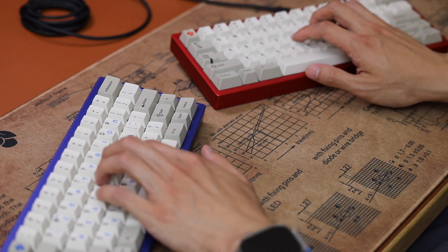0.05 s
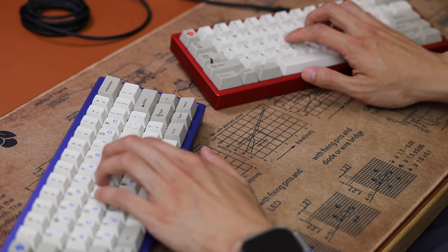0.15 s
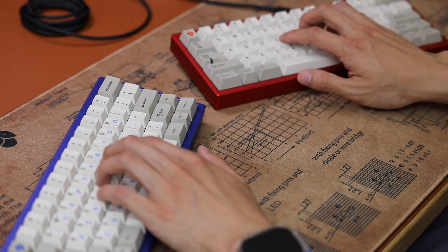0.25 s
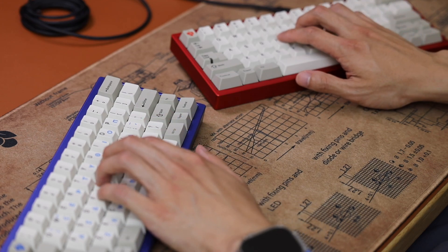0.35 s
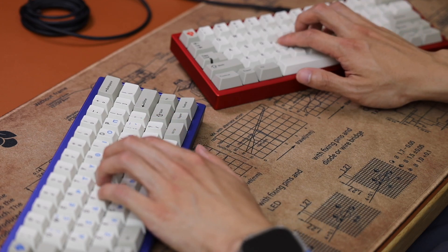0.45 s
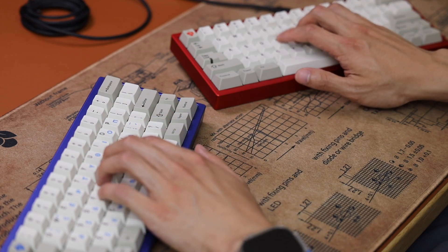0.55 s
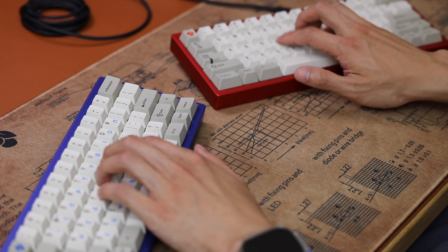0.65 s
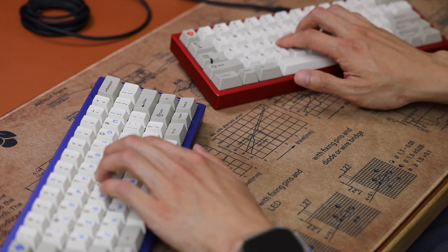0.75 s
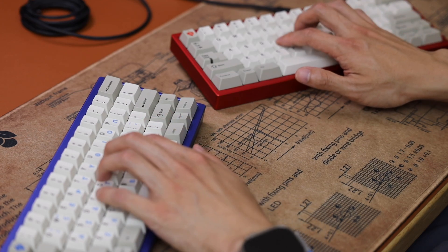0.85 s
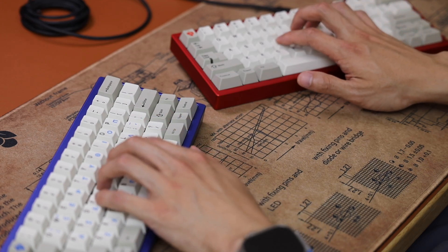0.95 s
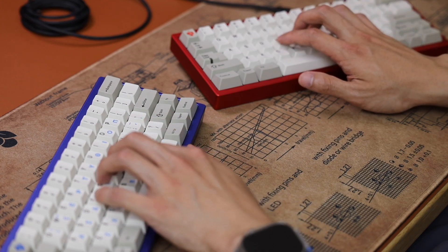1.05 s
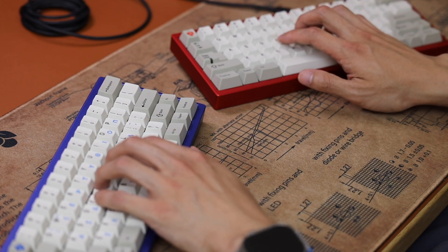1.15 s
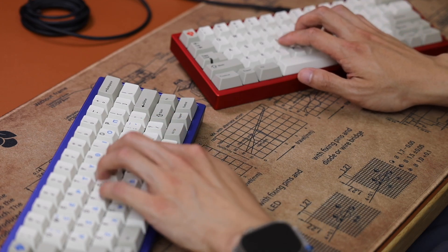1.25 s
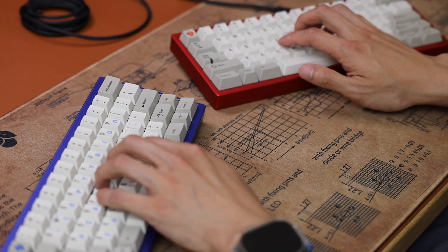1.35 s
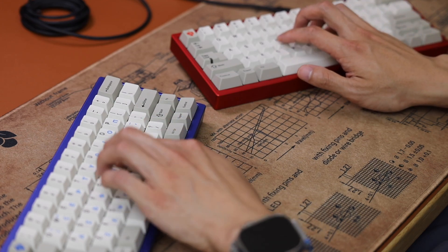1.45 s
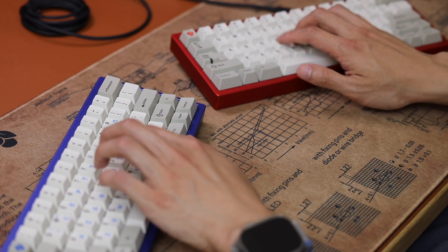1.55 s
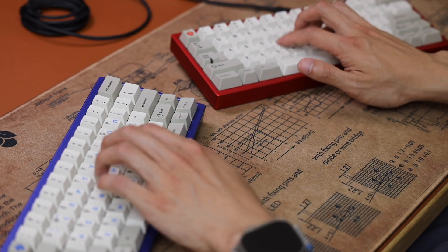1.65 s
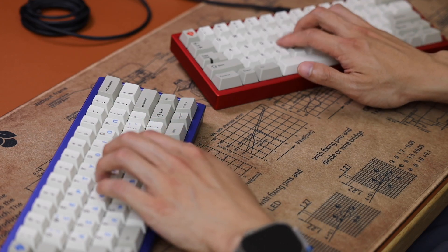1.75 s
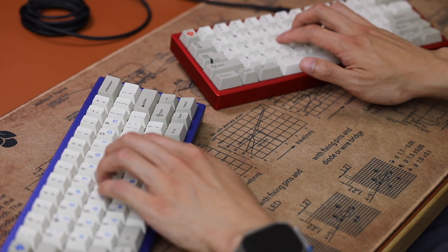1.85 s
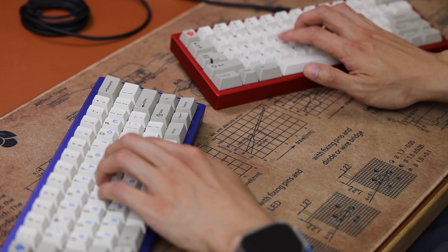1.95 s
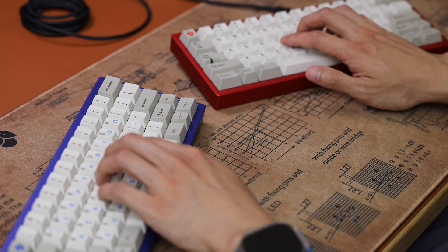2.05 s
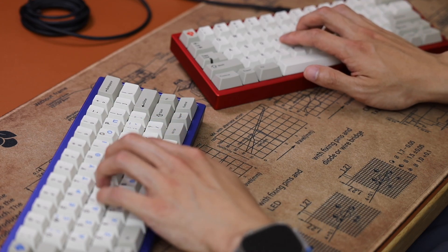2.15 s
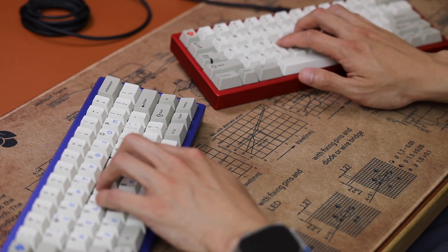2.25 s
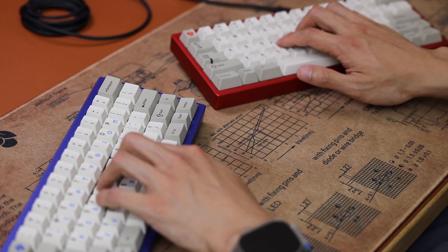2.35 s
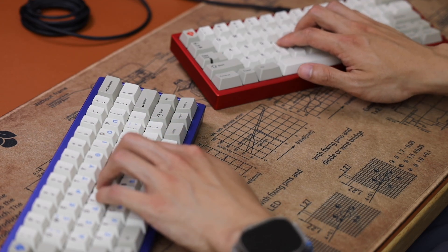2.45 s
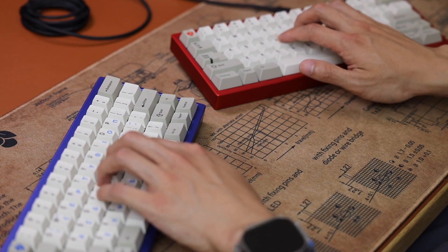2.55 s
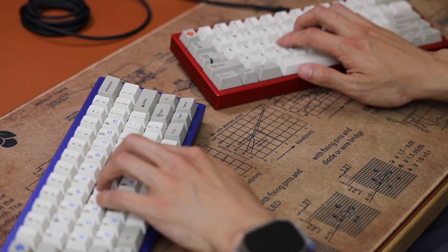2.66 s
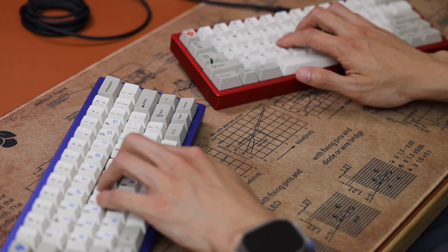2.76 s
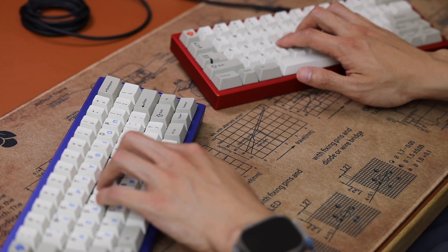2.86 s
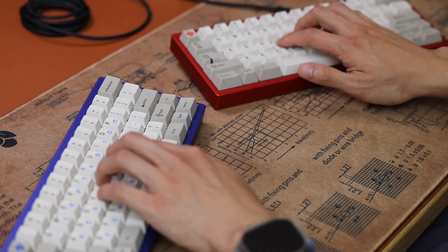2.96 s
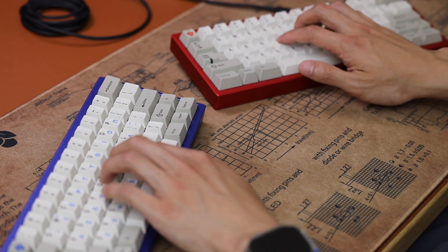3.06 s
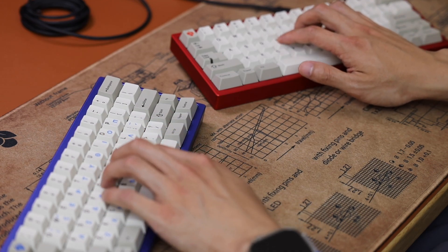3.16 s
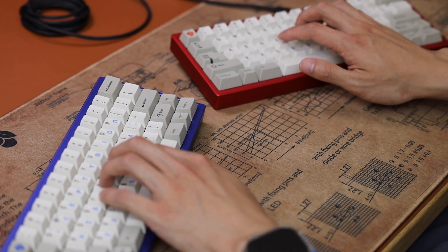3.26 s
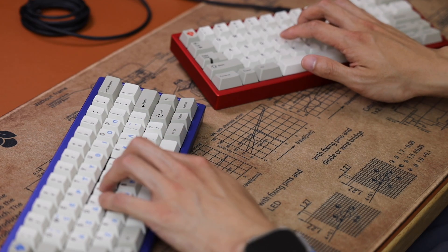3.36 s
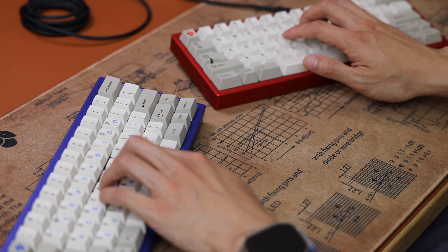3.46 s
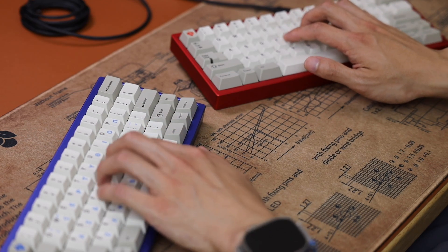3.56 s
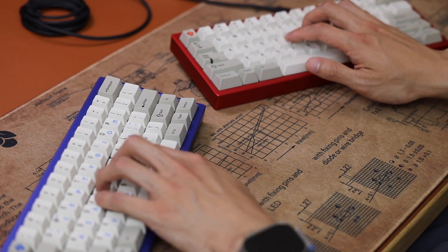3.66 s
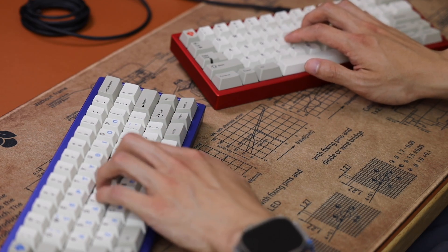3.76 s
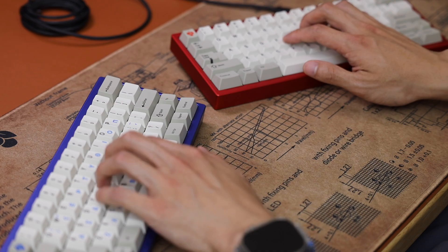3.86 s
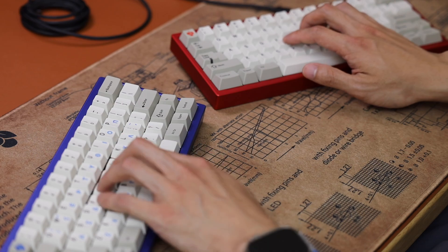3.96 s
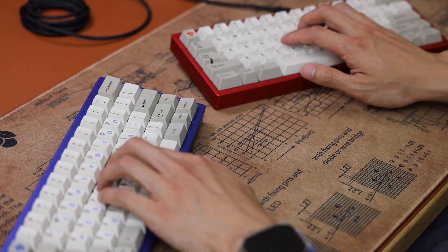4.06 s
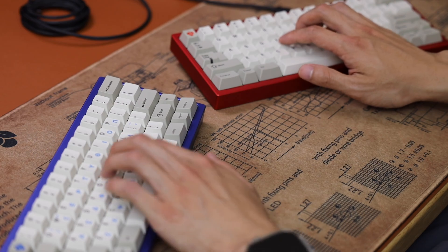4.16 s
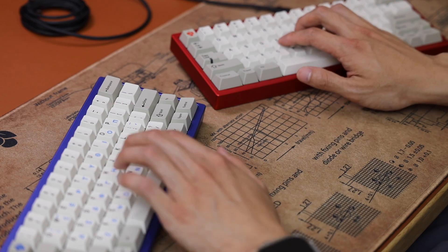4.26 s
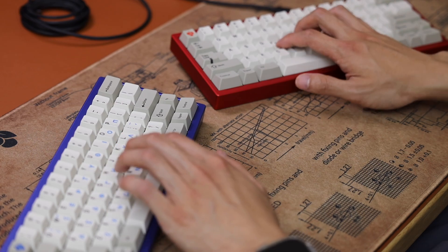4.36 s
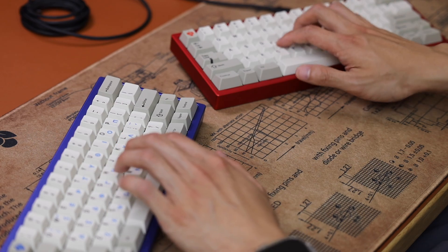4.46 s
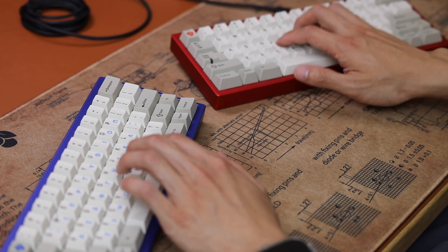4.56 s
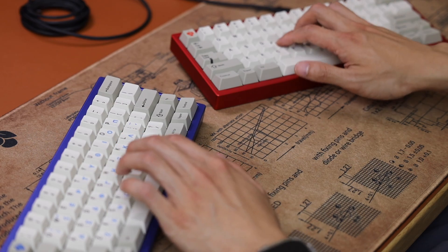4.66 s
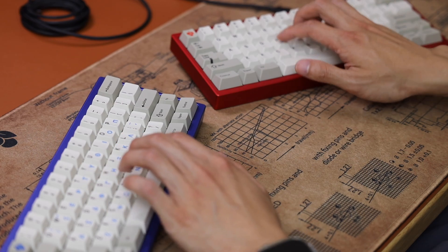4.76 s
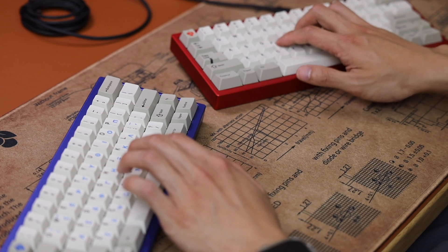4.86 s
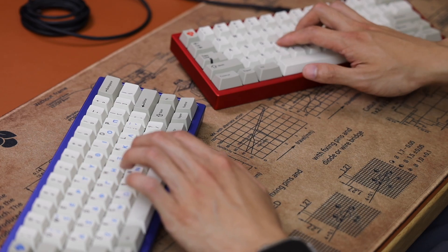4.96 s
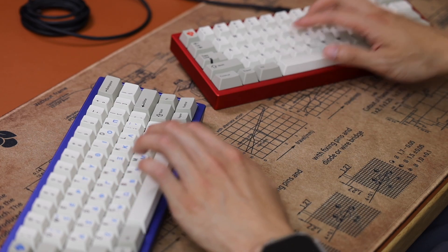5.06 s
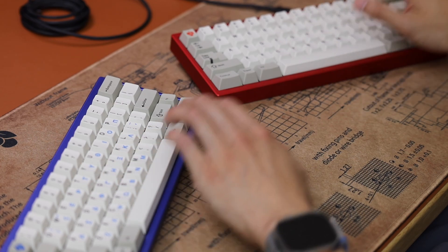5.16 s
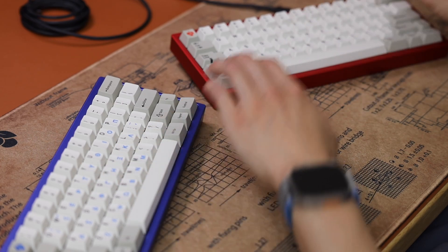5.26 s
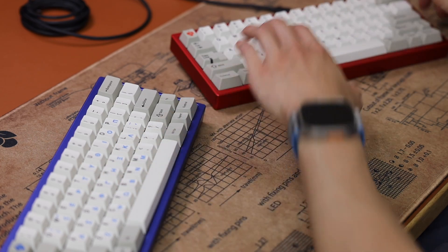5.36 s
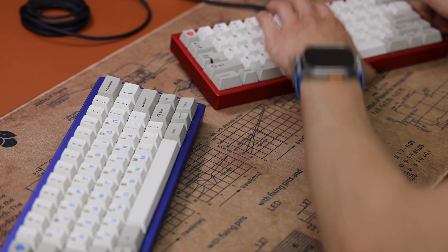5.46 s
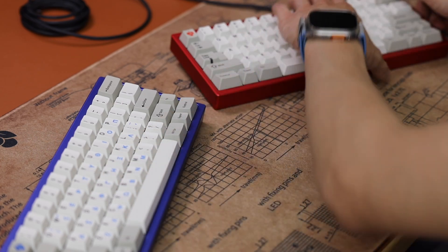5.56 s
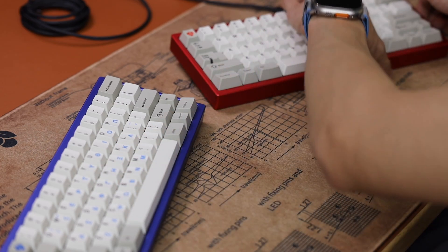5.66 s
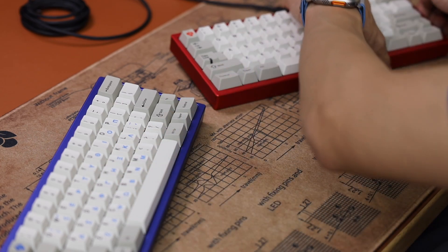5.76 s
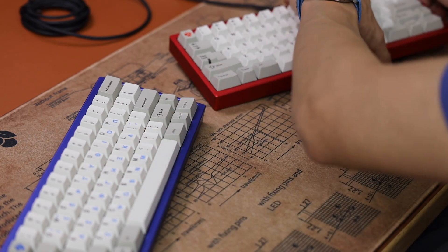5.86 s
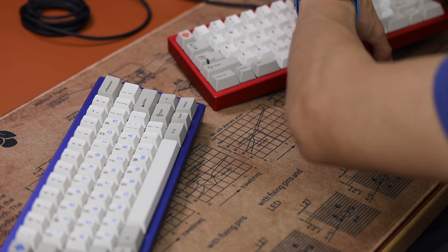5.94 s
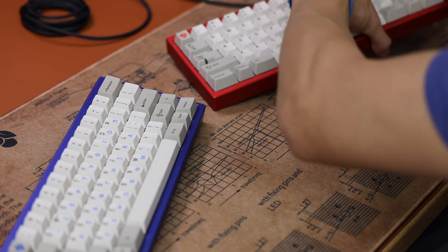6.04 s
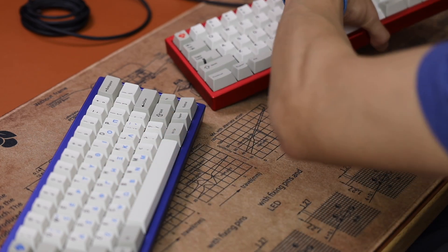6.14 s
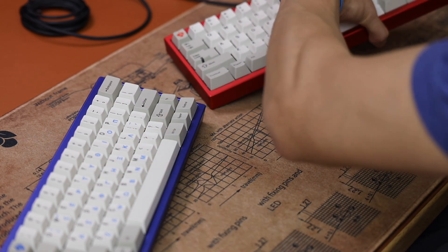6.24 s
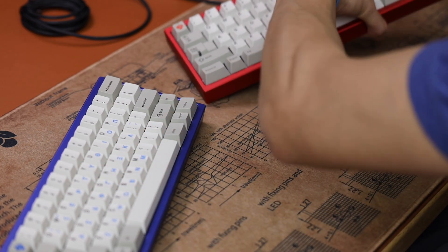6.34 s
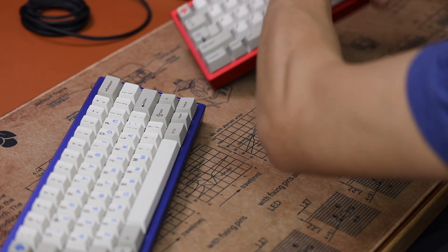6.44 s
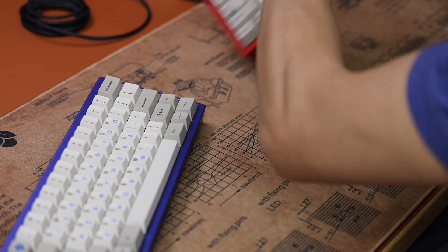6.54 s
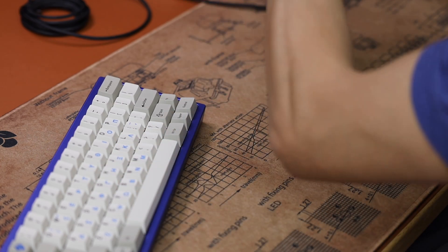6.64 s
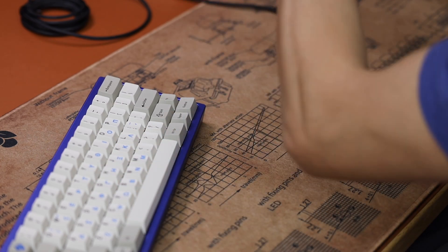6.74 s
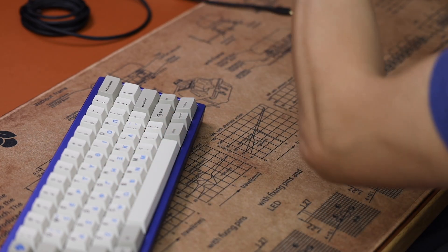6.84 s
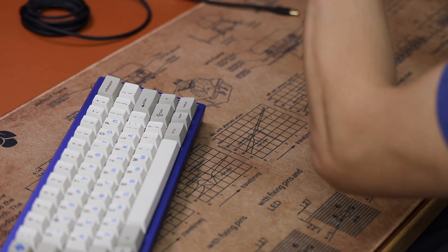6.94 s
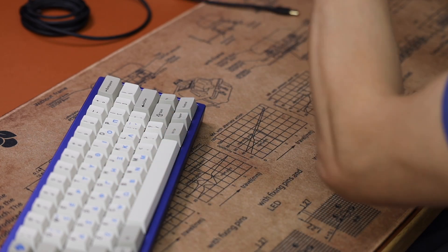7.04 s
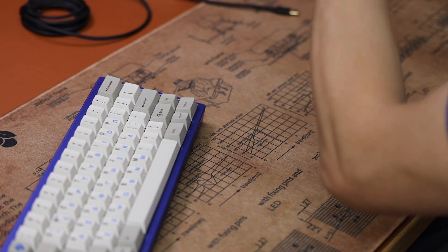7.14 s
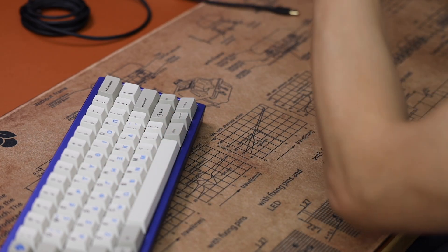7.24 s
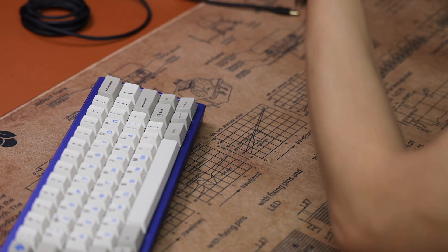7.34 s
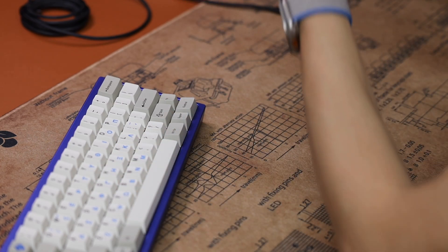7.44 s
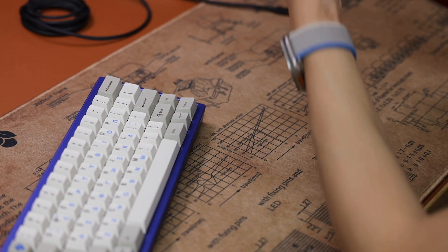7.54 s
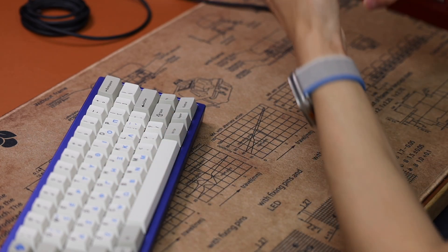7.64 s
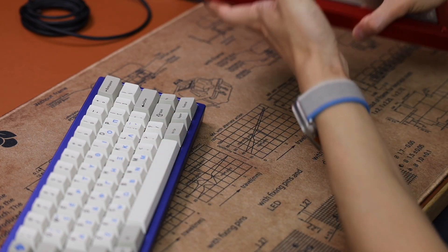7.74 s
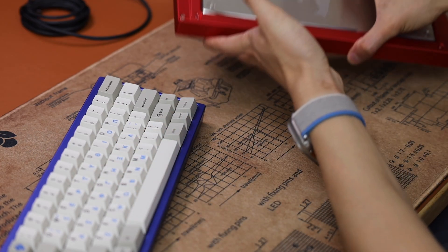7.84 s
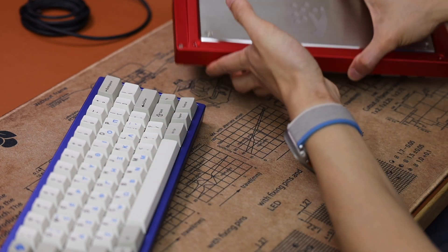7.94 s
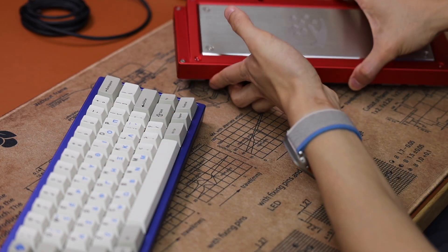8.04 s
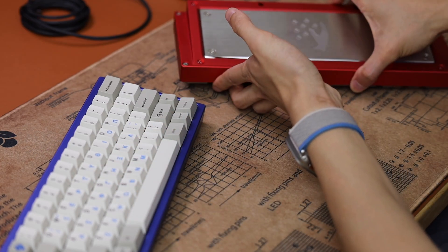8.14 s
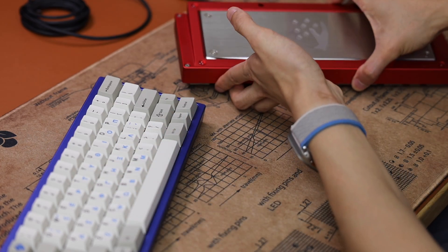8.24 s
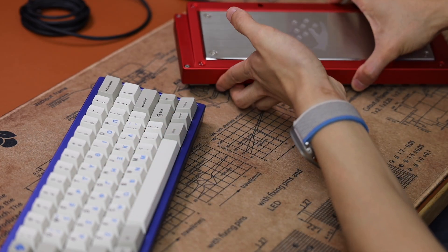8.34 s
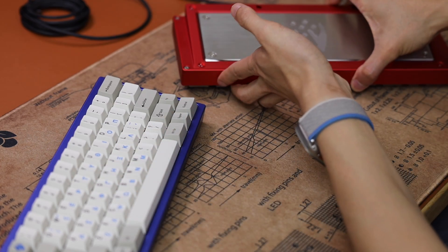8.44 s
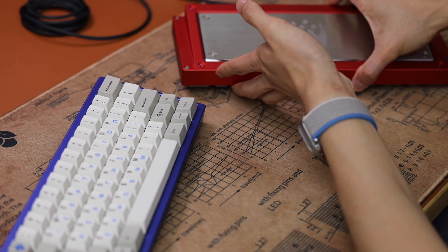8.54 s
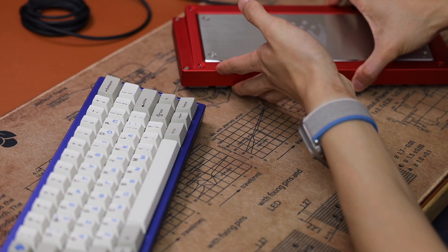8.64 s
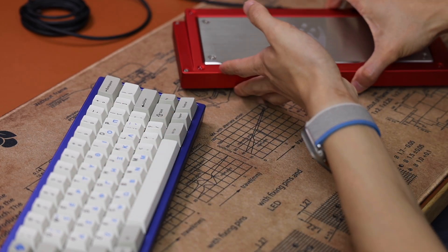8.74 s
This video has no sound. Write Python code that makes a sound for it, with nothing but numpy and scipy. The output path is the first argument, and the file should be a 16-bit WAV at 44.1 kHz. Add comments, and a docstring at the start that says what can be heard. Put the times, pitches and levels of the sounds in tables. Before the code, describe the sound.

Fingers drum crisp mechanical keys in a small hard room, then stop; quiet case knocks and a brief hiss of skin follow over faint fan hum.

```python
"""Desk in a small hard room: fingers drum on two mechanical keyboards, fast single keys, then handfuls.
One keyboard is then lifted and turned over with a few knocks and a rub. Keys, knocks and desk booms are
sums of dying sines; the rub is shaped noise. Echoes and a sparse noise tail answer keys and knocks.
A faint fan (narrow noise bands) and microphone hiss (broad noise) lie underneath."""
import sys
import numpy as np
from scipy import signal
from scipy.fft import rfft, irfft
from scipy.io import wavfile
from scipy.ndimage import uniform_filter1d

SR = 44100
rng = np.random.default_rng(int(sys.argv[2]) if len(sys.argv) > 2 else 0)


def voltage_ratio(decibels):
    """Convert decibels (scalar or array-like) to amplitude ratios, 20 dB per decade."""
    exponent = np.asarray(decibels, float) / 20
    return 10 ** exponent


def generate_wav(signal):
    """Clip the signal to [-1, 1] and save it as 16-bit WAV at the path in sys.argv[1]."""
    frames = np.transpose(np.atleast_2d(signal))
    scaled = np.clip(frames, -1, 1) * 32767
    pcm = np.round(scaled).astype(np.int16)
    wavfile.write(sys.argv[1], SR, pcm)


N = 388064  # samples

# keys landing or springing back: [t/s, level/dB, cap f/Hz, stem tick re cap/dB]
KEY_HITS = [(-0.038, -17.5, 3100, -6.5), (0.0633, -35, 2690, -6), (0.1311, -46, 3300, -17),
            (0.2835, -37.5, 1780, -13), (0.3707, -27, 3100, -16), (0.432, -17, 3090, -5),
            (0.5092, -16.5, 3080, -9), (0.5686, -15.5, 2850, -7.5), (0.6317, -16, 3060, -7),
            (0.6918, -19.5, 3130, -9.5), (0.7435, -22, 3000, -12), (0.7637, -16, 3020, -5.5),
            (0.7993, -15.5, 3200, -8.5), (0.9288, -17.5, 3300, -9.5), (0.9947, -23.5, 3450, -7),
            (0.9971, -20, 3200, -7.5), (1.0511, -20, 3330, -9.5), (1.1291, -18, 3310, -13),
            (1.2111, -16.5, 3530, -7), (1.261, -20, 3340, -3.5), (1.2846, -20, 3040, -13),
            (1.3523, -12.5, 3280, -7.5), (1.3804, -21, 3300, -15), (1.4413, -18.5, 3330, -11),
            (1.4699, -21, 3360, -10), (1.5146, -17.5, 3280, -12), (1.5473, -17, 3400, -12),
            (1.5712, -17.5, 2600, -1), (1.6372, -18.5, 3370, -9), (1.6965, -30, 1740, -4),
            (1.7226, -21.5, 3230, -18), (1.7412, -16, 3030, -12), (1.7659, -23, 2870, -8),
            (1.8054, -16.5, 3200, -7), (2.2202, -14, 3150, -9.5), (2.2491, -20.5, 3400, 1.5),
            (2.255, -31, 3160, -1), (2.2614, -13, 2880, -10), (2.2633, -13.5, 3100, -6),
            (2.272, -29.5, 3200, -15), (2.307, -34, 2780, -2), (2.5431, -33, 3200, -8),
            (2.5483, -35, 1757, -12), (2.6767, -20, 3360, -8), (2.688, -20.5, 3400, -7),
            (2.6952, -15.5, 3060, -1), (2.7079, -8, 3440, -14), (2.7184, -15, 2700, -4.5),
            (2.9308, -42.5, 2900, 2), (3.0064, -32, 3180, -14), (3.3257, -12.5, 3360, -6.5),
            (3.3374, -16, 3200, -4), (3.3459, -16, 3050, -13), (3.355, -21, 3280, -9),
            (3.361, -41, 2880, -18), (3.5678, -27.5, 3030, -9), (3.6375, -6.5, 3340, -9.5),
            (3.8663, -26.5, 3150, -3), (3.9287, -12, 3320, -8.5), (3.931, -11, 2940, -1),
            (3.943, -20, 2940, -15), (3.9518, -23, 3250, -15), (4.1632, -26.5, 3390, -14),
            (4.1666, -21, 3030, -5.5), (4.3182, -17.5, 2920, -4.5), (4.3273, -13, 3500, -16),
            (4.3367, -8.5, 2940, -2.5), (4.5126, -28.5, 3200, -16), (4.5165, -27.5, 3320, -9),
            (4.53, -32, 2900, -12), (4.6022, -14, 3040, -5), (4.609, -10.5, 2960, -3.5),
            (4.615, -14.5, 2950, -29), (4.7363, -22.5, 2730, -8), (4.8283, -14.5, 2950, 0),
            (4.8305, -16, 2780, -1), (4.8323, -7.5, 2870, -8.5), (4.8487, -21, 2880, -13),
            (5.0503, -24.5, 3120, -0.5), (5.054, -22.5, 1680, -20), (5.064, -22.5, 3010, -16)]
# low clack of the housing: [f/Hz, relative level/dB, t60/s]
HOUSING_MODES = [(1213, -11.5, 0.014), (1405, 4.5, 0.0047), (1764, 6, 0.0037), (2240, -9, 0.011)]
# bright tick of the stem: [f/Hz, relative level/dB, t60/s]
STEM_MODES = [(4690, 7.5, 0.0061), (6000, 11.5, 0.0025), (7090, 20.5, 0.0012), (10240, 11, 0.0051),
              (12800, -0.5, 0.0043)]
# plate under the keys: [f/Hz, relative level/dB, t60/s]
PLATE_MODES = [(1380, -6, 0.24), (1705, -3, 0.1), (2480, 30, 0.0087), (2940, 19, 0.023), (3030, -7, 0.028),
               (3360, -37.5, 0.077), (3860, -1.5, 0.02)]
# hands and cable on the lifted case: [t/s, level/dB, f/Hz, crack re body/dB]
CASE_KNOCKS = [(5.602, -28.5, 2800, -15), (5.638, -30.5, 1730, -15), (5.965, -32.5, 320, -17),
               (5.967, -31.5, 740, -14), (5.967, -35, 2980, -9), (6.28, -38.5, 1320, -20),
               (7.543, -32, 2520, -14), (7.574, -41.5, 1510, -18), (7.643, -24.5, 1580, -13),
               (7.678, -34, 1500, -24), (7.718, -24.5, 4860, -28), (7.753, -33, 2000, -28),
               (8.749, -36, 1120, -9)]
# partials of a knock: [multiple of its f, relative level/dB]
CASE_PARTIALS = [(.47, -28), (0.699, 4), (1, 6.5), (1.22, 3), (1.45, -0.5), (1.95, -5)]
# firm blows shaking the desk top: [t/s, level/dB, mode tilt/(dB/octave)]
DESK_THUMPS = [(0.433, -48, 10), (0.51, -47, 4), (0.57, -38, 11.5), (0.687, -42, 11), (0.744, -40.5, -4),
               (0.764, -38.5, 6.5), (1.547, -45, 8), (1.574, -38, 3), (1.643, -44, 2), (1.739, -42, 10.5),
               (1.802, -42.5, 6), (2.264, -38, 2), (2.71, -38, 7), (4.325, -37, 5), (4.341, -31, 4),
               (4.61, -32, -4), (4.824, -37, 12.5), (5.639, -55, 0.1), (5.965, -36, -10), (8.749, -45, 22)]
# desk top, before tilt: [f/Hz, relative level/dB, t60/s]
DESK_MODES = [(75.2, -4.5, 0.33), (106, -16, .15), (138.5, 8.5, 0.27), (169.7, -2.5, 0.57),
              (206.3, 3, 0.19), (256, -12.5, 0.83), (374, -11.5, 0.11)]
# rub spectrum: [f/Hz, relative level/dB]
RUB_SPECTRUM = [(500, -7), (1500, 7.5), (4000, 8), (8000, -0.5), (14000, -4), (16500, -14.5)]
# single early echoes: [delay t/s, left level/dB, right level/dB]
EARLY_ECHOES = [(.0019, -11, -16), (.0066, -10, -14), (.0082, -13, -13), (.0098, -17, -12),
                (.0128, -13, -14)]
# overhead echo and side of each board, rows far, near: [delay t/s, level/dB, left-right/dB]
BOARD_ECHOES = [(.0054, -12, -1.5), (.0047, 1, -3)]
# room tail: [f/Hz, t60/s]
TAIL_T60 = [(200, 0.39), (700, 0.59), (1800, 0.46), (4800, 0.43), (12000, 0.31)]
# fan tones: [f/Hz, rms level/dB, full width at half amplitude/Hz]
FAN_TONES = [(90.3, -69, 11), (326.3, -71.5, 9.9), (1213, -72.5, 12), (2300, -87, 2.7)]
# hiss spectrum: [f/Hz, relative level/dB]
AIR_SPECTRUM = [(18, -51), (30, -23), (86, -5), (125, -8.5), (171, -6), (261, -7), (323, -5.5), (625, -9.5),
                (1210, -12), (1420, -14.5), (14800, -28), (16500, -26)]
# left-right likeness of hiss and tail: [f/Hz, correlation]
LIKENESS = [(40, 0.77), (125, 0.67), (250, 0.62), (500, 0.6), (1000, 0.47), (2000, 0.08), (5000, -0.058),
            (14000, -0.26)]
# left-right balance of the noises: [f/Hz, left-right/dB]
BALANCE = [(60, -1.2), (380, -1.7), (2380, -2.5), (15000, 0.28)]

LEAD_SAMPLES = 4410  # room before time zero, for a key whose echo is still sounding
CONTACT_S = 0.0007  # first touch to blow
USUAL_CAP_HZ, CAP_T60_S, LONG_CAP_POWER = 3100, 0.0022, 2.7  # lower caps ring longer
PLATE_DB = -21.5
# housing share re cap at the usual level; dB lost per dB louder; ceiling before scatter
USUAL_DB, CLACK_DB, CLACK_SINK, CLACK_TOP_DB, CLACK_SCATTER_DB = -20, -13.5, 0.55, 1.5, 3
SOFT_DB, RATTLE_S = -27.5, 0.012  # softer keys spring back loosely
KEY_LOW_CUT_HZ = 754  # small caps radiate little below
DIP_HZ, DIP_Q = 11840, 26  # narrow dip in the treble of the keys, cut by a notch filter
PLACE, PLACE_SCATTER = 0.68, 0.12  # 0 far board, 1 near board
KNOCK_CYCLES = 11.3  # swings per t60
RUB_S, RUB_RISE_S, RUB_HOLD_S, RUB_FADE_S = 6.255, 0.042, 0.15, 0.13
RUB_DB, RUB_ENDS_DB, RUB_SWELL_DB = -50.5, -27, 0.5  # ends and swell re RUB_DB
SHADE_HZ, SHADE_DB = 8500, -8  # hands shade the treble of direct sound and early echoes
SCATTER_S, FRONT = 0.0019, 7.0  # overhead echo: decay constant; first arrival re scatter
TAIL_BUILD_S, TAIL_DB = 0.0035, 2  # the tail swells before it dies
AIR_DB = -54
BASS_CUT_HZ = 25


def keys():
    """Each key sums dying sines of cap, housing, stem and plate; soft ones rattle."""
    mix = np.zeros((4, N + LEAD_SAMPLES))
    draws = rng.standard_normal((len(KEY_HITS), 8))
    for (s, db, hz, tick_db), luck in zip(KEY_HITS, draws):
        clack_db = min(CLACK_DB - CLACK_SINK * (db - USUAL_DB), CLACK_TOP_DB)
        clack_db += CLACK_SCATTER_DB * luck[6]
        cap_t60 = CAP_T60_S * (USUAL_CAP_HZ / hz) ** LONG_CAP_POWER
        cap = ring([(hz, 0, cap_t60)], luck, rise_s=0.00032, spread=0)
        plate = ring(PLATE_MODES, luck, rise_s=0.0025, spread=0.014)
        tick = ring(STEM_MODES, luck[::-1], rise_s=0.0001, spread=0.025)
        clack = ring(HOUSING_MODES, luck, rise_s=0.00082, spread=0.029)
        sound = cap + voltage_ratio(PLATE_DB) * plate + voltage_ratio(tick_db) * tick - voltage_ratio(clack_db) * clack
        if db < SOFT_DB:
            sound = rattled(sound, luck)
        strike(mix, s + CONTACT_S, voltage_ratio(db) * sound, PLACE + PLACE_SCATTER * luck[7])
    mix = signal.lfilter(*signal.iirnotch(DIP_HZ, DIP_Q, SR), mix)
    return signal.sosfilt(signal.butter(4, KEY_LOW_CUT_HZ, "high", fs=SR, output="sos"), mix)


def knocks():
    """Dull partials of the case with a short crack of stem modes on top, rattling."""
    mix = np.zeros((4, N + LEAD_SAMPLES))
    draws = rng.standard_normal((len(CASE_KNOCKS), 8))
    for (s, db, hz, crack_db), luck in zip(CASE_KNOCKS, draws):
        modes = [(hz * k, part_db, KNOCK_CYCLES / hz) for k, part_db in CASE_PARTIALS]
        body = ring(modes, luck, rise_s=0.00017, spread=0.0078)
        crack = ring(STEM_MODES, luck, rise_s=0.0001, spread=0.014)
        sound = rattled(body + voltage_ratio(crack_db) * crack, luck)
        strike(mix, s, voltage_ratio(db) * sound, PLACE)
    return mix


def desk():
    """The desk top booms briefly under firm blows; each boom has its own tilt, darker or brighter."""
    mix = np.zeros((2, N + LEAD_SAMPLES))
    pivot_hz = DESK_MODES[2][0]
    draws = rng.standard_normal((len(DESK_THUMPS), 8))
    for (s, db, tilt_db), luck in zip(DESK_THUMPS, draws):
        modes = [(hz, mode_db + tilt_db * np.log2(hz / pivot_hz), t60) for hz, mode_db, t60 in DESK_MODES]
        boom = ring(modes, luck, rise_s=0.0024, spread=0.025, size=16000)
        add(mix, s, voltage_ratio(db) * boom, pan_db=-0.7)
    return mix


def rub():
    """Skin hisses along the case: noise that rises, holds with a slight swell, fades."""
    s = RUB_S + np.cumsum([0, RUB_RISE_S, RUB_HOLD_S, RUB_FADE_S])
    shape_db = [RUB_ENDS_DB, 0, RUB_SWELL_DB, RUB_ENDS_DB]
    db = np.interp(np.arange(N) / SR, s, shape_db, -80, -80)
    return voltage_ratio(RUB_DB + db) * noise(RUB_SPECTRUM, [(500, 0.46), (9000, 0.17)], patchy_db=2.0)


def room(blows):
    """Direct sound and single early echoes, scattered overhead echo, sparse tail."""
    direct, overhead = blows[:2], blows[2:]
    return early_sound(direct) + overhead_echo(overhead) + room_tail(direct)


def early_sound(direct):
    """Direct sound with its treble shaded by the hands, repeated by single reflections."""
    early = np.zeros((2, 2000))
    early[:, 0] = 1
    for late_s, *side_db in EARLY_ECHOES:
        early[:, round(late_s * SR)] = voltage_ratio(np.array(side_db))
    dull = signal.sosfilt(signal.butter(2, SHADE_HZ, fs=SR, output="sos"), direct)
    shaded = dull + voltage_ratio(SHADE_DB) * (direct - dull)
    return convolved(shaded, early)


def overhead_echo(overhead):
    """The strong overhead echo spreads out: a first arrival, then dying noise taps."""
    lag_s = np.arange(300) / SR
    spread = rng.standard_normal((2, 300)) * np.exp(-lag_s / SCATTER_S)
    spread[:, 0] = FRONT
    return convolved(overhead, spread / np.linalg.norm(spread, axis=1, keepdims=True))


def room_tail(direct):
    """Three sparse tails whose shares turn slowly with time, so successive blows ring differently."""
    out = np.zeros_like(direct)
    turn = 2 * np.pi * 3.1 * np.arange(direct.shape[1]) / SR
    for k in range(3):
        taps = np.zeros((2, SR))
        at = np.arange(300, SR - 20, 20) + rng.integers(0, 20, (2, (SR - 301) // 20))
        np.put_along_axis(taps, at, rng.standard_normal(at.shape), 1)
        hz, t, z = signal.stft(taps, SR, nperseg=256)
        alike = np.clip(read(LIKENESS, hz), -1, 1)[:, None]  # the two microphones hear the same bass
        z[1] = alike * z[0] + np.sqrt(1 - alike ** 2) * z[1]
        decay = (1 - np.exp(-t / TAIL_BUILD_S)) * voltage_ratio(-60 * t / read(TAIL_T60, hz)[:, None])
        tail = signal.istft(z * decay, SR, nperseg=256)[1]
        tail *= voltage_ratio(TAIL_DB + np.array([[-1.2], [1.2]])) / np.linalg.norm(tail, axis=1, keepdims=True)
        feed = direct.mean(0) * np.sqrt(2 / 3) * np.cos(turn + k * np.pi / 3)
        out += convolved(feed[None], tail)
    return out


def fan():
    """Wavering tones: noise in very narrow bands."""
    hz = np.fft.rfftfreq(N, 1 / SR)
    draws = rfft(rng.standard_normal(N))
    tones = np.zeros(N)
    for f, db, width in FAN_TONES:
        band = irfft(draws / (1 + (2 * (hz - f) / width) ** 2), N)
        tones += voltage_ratio(db) * evened(band)
    return tones


def air():
    """Steady broad noise: microphone hiss and low air."""
    return voltage_ratio(AIR_DB) * noise(AIR_SPECTRUM, LIKENESS, patchy_db=0.97)


def noise(colour, same, patchy_db):
    """Two-channel noise of a given spectrum with small drifting patches; rms 1."""
    hz = np.fft.rfftfreq(1024, 1 / SR)
    a, b, c, d, patches = rng.standard_normal((N // 256 + 5, 513, 5)).T
    patches = evened(uniform_filter1d(uniform_filter1d(patches, 10, 0), 14, 1))
    alike = np.clip(read(same, hz), -1, 1)[:, None]
    half_balance_db = read(BALANCE, hz)[:, None] / 2
    left = a + 1j * b
    right = alike * left + np.sqrt(1 - alike ** 2) * (c + 1j * d)
    z = np.array([left * voltage_ratio(half_balance_db), right / voltage_ratio(half_balance_db)])
    z *= voltage_ratio(read(colour, hz)[:, None] + patchy_db * patches)
    return evened(signal.istft(z, nperseg=1024, noverlap=768)[1][:, :N])


def ring(modes, luck, rise_s, spread, size=4000):
    """Dying sines after a soft contact, each blow slightly detuned; peak 1."""
    hz, db, t60 = np.transpose(modes)[:, :, None]
    t = np.arange(size) / SR
    detuned_hz = hz * (1 + spread * luck[:len(hz), None])
    signs = (-1.) ** np.arange(len(hz))[:, None]  # neighbouring modes swing opposite ways
    sines = signs * voltage_ratio(db - 60 * t / t60) * np.sin(2 * np.pi * detuned_hz * t)
    sound = sines.sum(0) * (1 - np.exp(-(t / rise_s) ** 2))
    return sound / abs(sound).max()


def rattled(sound, luck):
    """A loose part taps several times within a few milliseconds."""
    taps = np.zeros(round(RATTLE_S * SR) + 2)
    taps[0] = 1
    taps[(luck % 1 * len(taps)).astype(int)] = 0.5 * luck[::-1]
    return signal.fftconvolve(sound, taps / np.linalg.norm(taps))


def strike(mix, s, sound, place):
    """Adds a blow to rows 0-1 and its overhead echo, set by place, to rows 2-3."""
    far, near = np.array(BOARD_ECHOES)
    late_s, echo_db, side_db = far + np.clip(place, 0, 1) * (near - far)
    add(mix[:2], s, sound, side_db)
    add(mix[2:], s + late_s, voltage_ratio(echo_db) * sound, side_db / 2)


def add(mix, s, sound, pan_db):
    """Places a sound at a time and between left and right."""
    at = round(s * SR) + LEAD_SAMPLES
    part = mix[:, at:at + len(sound)]
    part += voltage_ratio(np.array([[pan_db / 2], [-pan_db / 2]])) * sound[:part.shape[1]]


def convolved(x, response):
    """Filters each row by a response, keeping the length."""
    return signal.fftconvolve(x, response, axes=1)[:, :x.shape[1]]


def evened(x):
    """Scales to rms 1."""
    return x / np.sqrt(np.mean(x ** 2) + 1e-20)


def read(points, hz):
    """Reads a table on a log-frequency axis."""
    f, value = np.transpose(points)
    return np.interp(np.log(hz + 1), np.log(f + 1), value)


def scene():
    """Keys and knocks in the room plus desk booms, over rub, fan and air."""
    blows = room(keys() + knocks()) + desk()
    return blows[:, LEAD_SAMPLES:] + rub() + fan() + air()


def band_limit(x):
    """A steep low-pass at the top of the band."""
    return signal.sosfilt(signal.butter(12, 16650, fs=SR, output="sos"), x)


def record(dry):
    """The microphone drops the deepest bass."""
    cut = signal.sosfilt(signal.butter(3, BASS_CUT_HZ, "high", fs=SR, output="sos"), dry)
    return band_limit(cut)


dry = scene()
out = record(dry)
generate_wav(out)
```